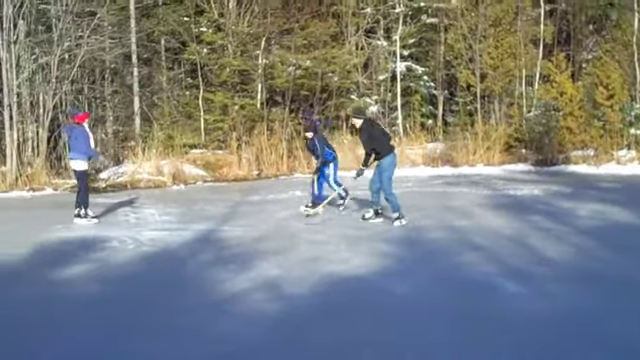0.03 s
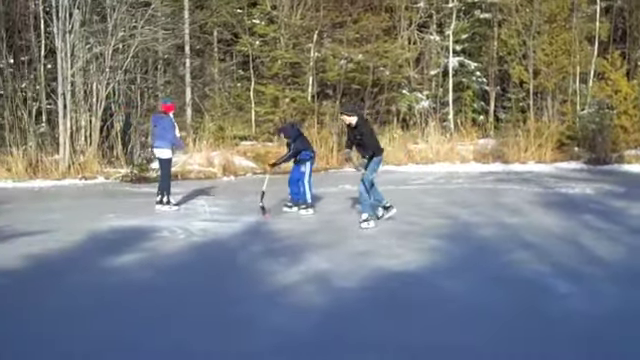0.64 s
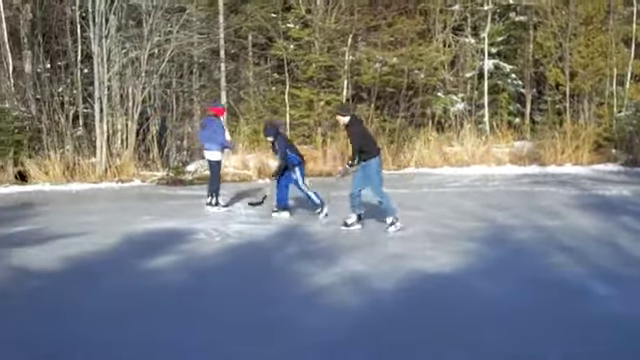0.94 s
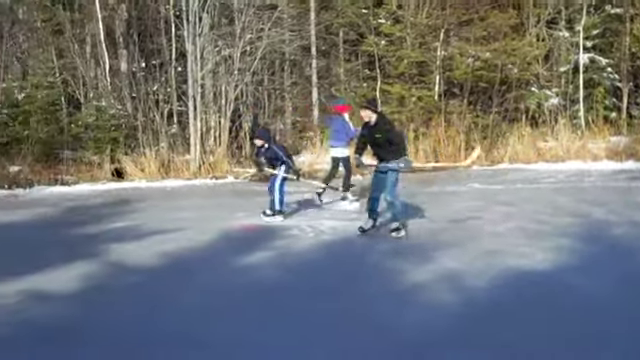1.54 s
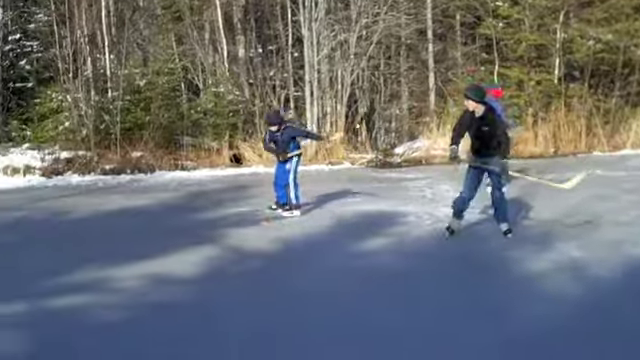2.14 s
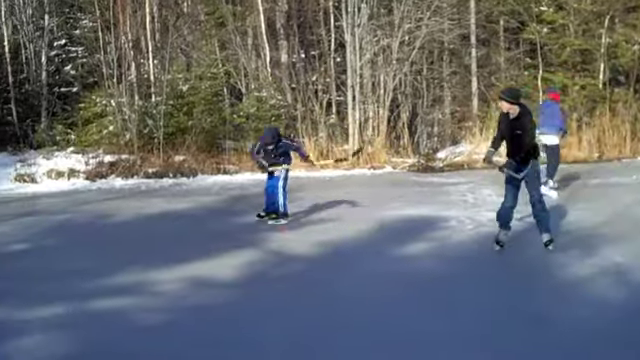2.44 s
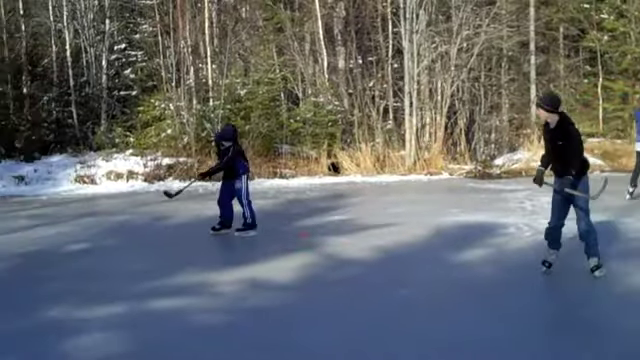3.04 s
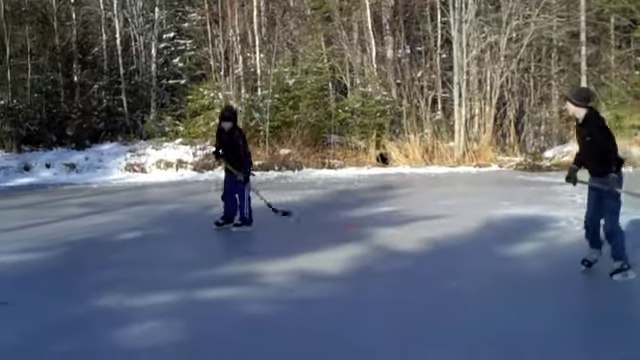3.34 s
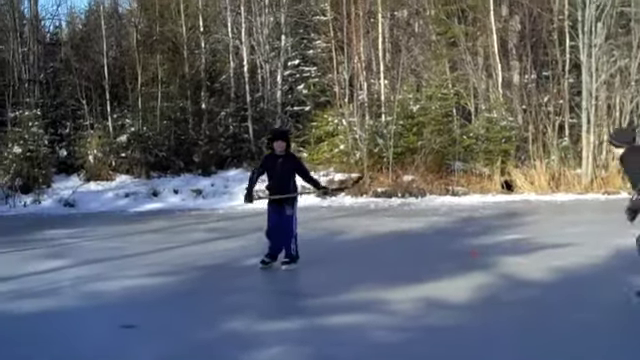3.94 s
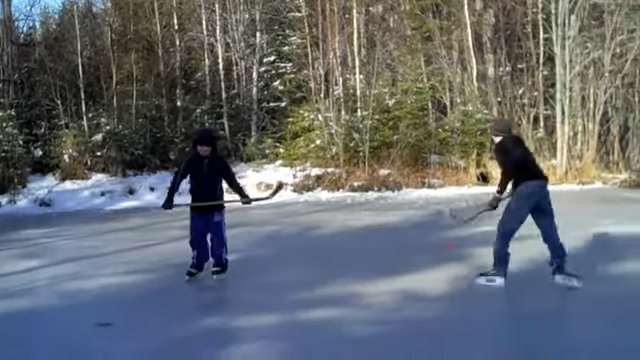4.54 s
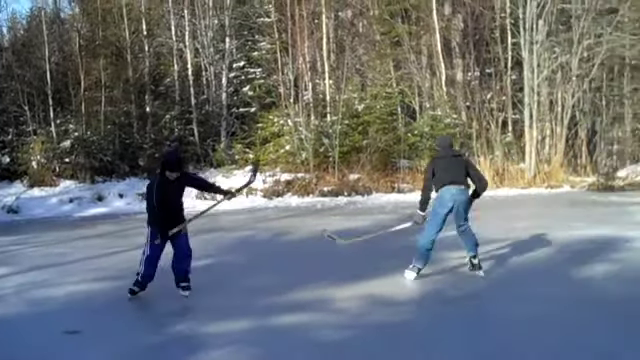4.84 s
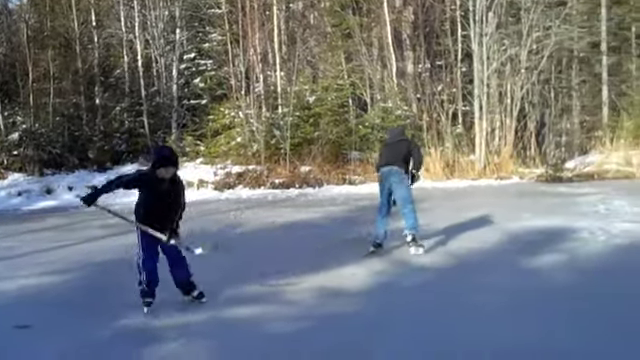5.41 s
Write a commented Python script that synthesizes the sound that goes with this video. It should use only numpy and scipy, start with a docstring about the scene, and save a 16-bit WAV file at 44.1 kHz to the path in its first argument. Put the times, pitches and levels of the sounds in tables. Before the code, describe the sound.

Hissing, gritty skate strokes on a frozen pond, with hollow wooden stick taps and a single bright crack of stick on puck.

```python
"""Hockey on a frozen pond. From the start, blades shave the ice by stick-slip friction and the
sheet hums and thuds under the skaters' weight; chips fracture off in a flurry from 0.6 s.
At 2.3 s a stick first taps, and at 2.6 s a slap shot cracks, coloured by bright narrow peaks.
More taps and strokes follow, with a second flurry of chips at 4.6 s. Throughout, the forest
along the shore scatters the sound back, over a faint breeze."""
import sys
import numpy as np
from scipy import signal
from scipy.fft import rfft, irfft, next_fast_len
from scipy.io import wavfile
from scipy.ndimage import uniform_filter1d, map_coordinates

SR = 44100
rng = np.random.default_rng(int(sys.argv[2]) if len(sys.argv) > 2 else 0)


def waveform_to_disk(signal):
    """Save audio, clipped to [-1, 1], as 16-bit WAV at the path in sys.argv[1]."""
    frames = np.transpose(np.atleast_2d(signal))
    scaled = np.clip(frames, -1, 1) * 32767
    samples = np.round(scaled).astype(np.int16)
    wavfile.write(sys.argv[1], SR, samples)


N = 245637

# hiss spectrum of the steel edge: f/Hz, level/dB
EDGE_SPECTRUM = [(2500, -38), (3500, -4.5), (4150, 2), (4700, -1), (5900, 2.5), (6700, -2), (7400, 1),
                 (8300, -9), (9000, -12.5), (9800, -20.5), (13500, -32), (15000, -54)]
# grinding spectrum of boot and blade holder: f/Hz, level/dB
GRIND_SPECTRUM = [(120, -29), (400, -10), (800, -8.5), (1100, -4.5), (1700, -3), (2000, -4), (2350, -1.5),
                  (2800, -5), (3300, -3.5), (4500, -31.5), (8000, -42)]


def amp(db):
    """Amplitude ratio of a level in decibels."""
    return 10 ** (np.asarray(db) / 20)


def unit(x):
    """Normalisation to rms 1."""
    return x / np.sqrt(np.mean(x ** 2) + 1e-20)


def along(points, hz):
    """Interpolation of (f/Hz, value) points on a logarithmic frequency axis."""
    f, values = np.transpose(points)
    return np.interp(np.log(hz + 1), np.log(np.sort(f)), values)


def wobble(rate):
    """Smooth random modulation: a spline through `rate` knots a second."""
    knots = rng.standard_normal(int(N * rate / SR) + 4)
    return map_coordinates(knots, [np.arange(N) * rate / SR])


def add(track, start_s, sound):
    """Superposition of a sound on a track."""
    start = max(round(start_s * SR), 0)
    track[start:start + len(sound)] += sound[:N - start]


def filtered(x, response):
    """Linear filtering: the spectrum of x times a complex frequency response."""
    size = next_fast_len(x.shape[-1] + 4096, True)
    hz = np.fft.rfftfreq(size, 1 / SR)
    return irfft(rfft(x, size) * response(hz), size)[..., :x.shape[-1]]


def coloured(x, spectrum):
    """Minimum-phase filtering with unit energy: the spectrum sets shape, not level."""
    size = 2048
    cepstrum = irfft(np.log(amp(along(spectrum, np.fft.rfftfreq(size, 1 / SR)))))
    cepstrum[1:size // 2] *= 2  # folding the cepstrum makes the filter causal
    cepstrum[size // 2 + 1:] = 0
    kernel = irfft(np.exp(rfft(cepstrum)))
    return signal.fftconvolve(x, kernel / np.linalg.norm(kernel))[:len(x)]


def band_pass(f, centre, width):
    """Second-order band-pass response, 1 at its centre; all arguments in Hz."""
    return 1j * f * width / (centre ** 2 - f ** 2 + 1j * f * width)


def burst(hold, t60, attack):
    """Noise of a crushing contact: rise, hold and exponential decay, times in s."""
    t = np.arange(SR // 4) / SR
    decay = amp(-60 * np.maximum(t - hold, 0) / t60)
    return rng.standard_normal(len(t)) * (1 - np.exp(-t / attack)) * decay


def ports(x, diffuse_db):
    """Diffraction: two close microphone ports share the bass; their housing scatters and shades treble."""
    # scattered sound against direct: f/Hz, level/dB
    diffuse_share = [(250, -30), (1000, -20), (2500, -13), (6000, -10), (8500, -5), (10000, -2)]
    # shadowing, left minus right: f/Hz, level/dB
    balance = [(2300, 0), (4600, -0.5), (5900, -7), (7400, 14.5), (10000, 7.5), (14000, 12)]
    # lead of the left port: f/Hz, phase/rad
    lead = [(2500, -0.08), (5300, -0.32), (6700, 0.63), (8200, -0.68), (10500, -0.45)]
    t = np.arange(SR // 100) / SR
    sprays = rng.standard_normal((3, len(t))) * np.exp(-t / .002)  # short reflections in a drifting mix
    scattered = sum(wobble(20) * signal.oaconvolve(x, h / np.linalg.norm(h))[:N] for h in sprays)
    side = filtered(scattered / np.sqrt(len(sprays)), lambda hz: amp(diffuse_db + along(diffuse_share, hz)))

    def shade(hz):
        halves = [[.5], [-.5]]
        pair = amp(along(balance, hz) * halves) * np.exp(1j * along(lead, hz) * halves)
        return pair / np.abs(pair.mean(axis=0))
    return filtered(np.array([x + side, x - side]), shade)


def placed(pair):
    """Time of arrival: sound from the right reaches the left port later."""
    # bearing of the busiest skater: t/s, angle to the right/deg
    path = [(0, 5), (2.6, 20), (3.5, 27), (4.7, 20), (5.5, -26)]
    n = np.arange(N)
    bearing = np.radians(np.interp(n / SR, *np.transpose(path)))
    lag = SR * .02 * np.sin(bearing) / 343  # samples, for ports 0.02 m apart
    return np.array([map_coordinates(pair[0], [n - lag / 2]), map_coordinates(pair[1], [n + lag / 2])])


def winter_air():
    """Ambient noise: a faint, stationary broadband floor."""
    # still air: f/Hz, level/dB
    air_spectrum = [(15, -68), (25, -11), (243, 3.5), (318, 10), (769, -2), (1390, -16), (7280, 4.5),
                    (13800, -25.5), (15000, -53)]
    return amp(-58.5) * unit(coloured(rng.standard_normal(N), air_spectrum))


def breeze():
    """Flow noise: moving air rumbles below about 80 Hz, uncorrelated between the ports."""
    return amp(-66.5) * unit(filtered(rng.standard_normal((2, N)), lambda hz: 1 / (1 + (hz / 80) ** 2)))


def forest(x, delay, t60, rise):
    """Scattering: trunks along the shore return a dense echo that swells and decays; times in s."""
    # colour of the echo: f/Hz, gain/dB
    echo_spectrum = [(150, -2), (1500, 2), (3000, -2.5), (7000, -7.5), (12000, -1)]
    late = np.maximum(np.arange(SR) / SR - delay, 0)
    tail = rng.standard_normal(SR) * (1 - np.exp(-late / rise)) * amp(-60 * late / t60)
    tail = filtered(tail / np.linalg.norm(tail), lambda hz: amp(along(echo_spectrum, hz)))
    return signal.fftconvolve(x, tail)[:N]


def steps():
    """Impact on a plate: a skater's weight lands and the ice sheet thuds."""
    # landings: t/s, relative level/dB
    landings = [(0.203, -33), (0.224, -30), (0.559, -32.5), (0.803, -36), (0.967, -45), (1.247, -32),
                (2.175, -33.5), (2.218, -34.5), (2.575, -35), (3.963, -36), (4.012, -34.5), (4.329, -43),
                (4.425, -36.5), (4.719, -33)]
    # the sheet's response to a landing: f/Hz, level/dB
    thud_spectrum = [(25, -30), (60, -32), (100, -26), (160, -1.5), (240, -0.5), (340, 7), (560, 1),
                     (900, -13), (1800, -40)]
    force = np.zeros(N)
    for start, db in landings:
        add(force, start, amp(db - 6) * burst(hold=0.0037, t60=0.094, attack=0.0015))
    return coloured(force, thud_spectrum)


def taps():
    """Free vibration: a short contact leaves one damped, hollow mode of the stick sounding."""
    # a stick meets puck or ice: t/s, relative level/dB, mode f/Hz
    knocks = [(2.2562, -31.5, 1370), (2.9827, -30.5, 1375), (3.3718, -31, 1540), (3.387, -32.5, 1360),
              (3.499, -37.5, 1370), (3.568, -39.5, 1320), (3.966, -36.5, 1420), (5.2627, -30.5, 1320),
              (5.503, -23, 1390)]
    # wooden contact: f/Hz, level/dB
    wood_spectrum = [(150, -31), (500, -22), (900, 9), (1450, -18), (1900, 11.5), (2300, 9), (4500, 3.5),
                     (7000, 3.5), (12000, -41)]
    contact, hollow = np.zeros((2, N))
    t = np.arange(SR // 10) / SR
    envelope = amp(-60 * t / 0.03) * (1 - np.exp(-t / 0.0016))
    for start, db, hz in knocks:
        add(contact, start, amp(db) * burst(hold=0.0014, t60=0.026, attack=0.00039))
        add(hollow, start, amp(db + 2) * envelope * np.sin(2 * np.pi * hz * t))
    return coloured(contact, wood_spectrum) + hollow


def effort():
    """Incoherent addition: stroke and glide powers sum to the gains of hiss, grinding and ice sheet."""
    # pushes of a blade: t/s, duration/s, hiss level/dB, grinding re hiss/dB, load on the sheet/dB
    strokes = [(-0.02, 0.3, -35, -5.5, -12), (0.516, 0.043, -38, -4.5, -4), (0.625, 0.018, -33.5, -9, -3),
               (0.685, 0.058, -37, -5, 4.5), (0.76, 0.12, -39.5, -6, 1), (0.894, 0.12, -49, 1.5, -7),
               (1.228, 0.068, -36.5, -3, -2), (1.322, 0.035, -36.5, -4, -3), (1.372, 0.039, -31, -5.5, -6),
               (1.479, 0.049, -44.5, 1.5, -1.5), (1.557, 0.046, -41.5, -2, -2),
               (1.623, .12, -38, -0.5, -1.5), (1.788, 0.061, -45.5, 3, -3.5), (1.883, 0.14, -66, 4, 4),
               (2.067, 0.017, -46.5, 5.5, 3), (2.144, 0.1, -48.5, -4, -1.5), (2.44, 0.19, -53.5, 1.5, 1),
               (2.886, 0.076, -43.5, 0.5, -3), (3.25, 0.017, -46, -0.5, 4), (3.313, 0.037, -51, -1, 0),
               (3.405, 0.081, -47, -1.5, 2), (3.549, 0.027, -50, 4, 4.5), (3.688, 0.16, -50, 0.5, 1),
               (3.928, 0.13, -45.5, -1, -0.5), (4.033, 0.048, -39, -6, -15), (4.178, 0.031, -46.5, 0, -2.5),
               (4.413, 0.15, -45, -1.5, -0.5), (4.586, 0.085, -35.5, -9, 7), (4.682, 0.13, -33.5, -7, 4),
               (4.871, 0.054, -43.5, 4.5, 5.5), (4.892, 0.13, -45, 0.5, 7.5), (5.103, 0.21, -42, -5, -2.5),
               (5.311, 0.23, -39.5, -2, 3)]
    attack_s, release_db_per_s = 0.0092, 212  # the edge digs in, then lifts away
    glide_db = [[-52.5], [-53], [-56.5]]  # coasting: hiss, grinding, sheet
    t = np.arange(N) / SR
    power = amp(glide_db) ** 2 * np.ones(N)
    for start, length, hiss_db, grind_db, weight_db in strokes:
        rise = np.clip((t - start) / attack_s, 0, 1)
        release = amp(-release_db_per_s * np.maximum(t - start - length, 0))
        sheet_db = -50 + 0.34 * (hiss_db + 38.5) + weight_db  # grows 0.34 dB per dB of hiss
        power += (amp([[hiss_db], [hiss_db + grind_db], [sheet_db]]) * rise * release) ** 2
    return np.sqrt(power)


def fractures(rate, spread_db, life, smooth):
    """Stick-slip envelope: `rate` slips a second, time constant `life`/s, over a `smooth` power share."""
    gaps, strengths = rng.random((4000, 2)).T
    onsets = (np.cumsum(.2 + 1.6 * gaps) * SR / rate).astype(int)
    energy = np.bincount(onsets[onsets < N], amp(spread_db * strengths[onsets < N]) ** 2, N)
    age = np.arange(SR // 20) / SR / life
    power = np.abs(signal.fftconvolve(energy, age * np.exp(-age))[:N])
    return np.sqrt(smooth + (1 - smooth) * power / power.mean())


def patchy(x, depth_db):
    """Random spectral modulation: resonances come and go as blade angle and contact point change."""
    spectra = signal.stft(x, nperseg=512)[2]
    field = uniform_filter1d(rng.standard_normal(spectra.shape), size=4, axis=0)  # smooth in frequency
    field = uniform_filter1d(field, size=6, axis=1)  # and in time
    return unit(signal.istft(spectra * amp(depth_db * unit(field)), nperseg=512)[1][:N])


def blades():
    """Friction excitation: each slip drives the steel edge, boot and holder, and the floating ice."""
    # hum of the ice sheet: f/Hz, level/dB
    sheet_spectrum = [(25, -48), (140, -1), (250, -3), (320, 6), (600, 2.5), (850, -8.5), (1600, -28.5)]
    edge_gain, grind_gain, sheet_gain = effort()
    bumps = amp(1.4 * wobble(70))  # uneven ice makes the pressure on the edge flutter
    slips = bumps * fractures(rate=280, spread_db=19, life=0.00081, smooth=0.35)

    def scrape(spectrum, depth_db):
        friction = slips * patchy(rng.standard_normal(N), depth_db)
        return unit(coloured(friction, spectrum))
    edge = edge_gain * scrape(EDGE_SPECTRUM, depth_db=2)
    grind = grind_gain * scrape(GRIND_SPECTRUM, depth_db=2)
    sheet = sheet_gain * scrape(sheet_spectrum, depth_db=1.5)
    return edge + grind + sheet


def chips():
    """Brittle fracture: a bright snap inside a few milliseconds of crushing that shakes edge and boot."""
    # a blade bites off ice: t/s, relative level/dB, boot's offset/dB
    bites = [(0.109, -26, -1), (0.23, -10, -21), (0.466, -19.5, -5.5), (0.596, -8, -5), (0.616, -11.5, -9),
             (0.622, -6.5, -7.5), (0.649, -19, -1), (0.674, -10, -5.5), (0.689, -12.5, -11),
             (0.707, -15, -5), (0.7228, -12, -9), (0.733, -14.5, -2), (0.742, -13, -6.5), (0.75, -15, -6),
             (0.782, -14, -4.5), (0.803, -16, -9), (0.838, -11.5, -7), (0.847, -19, -10), (1.1536, -13, -8),
             (1.189, -15, -6.5), (1.217, -18, -6), (1.402, -20, -7), (1.413, -14.5, -19),
             (1.5631, -12.5, -11), (1.71, -14.5, -5), (2.3, -26.5, 2), (3.135, -28, -7), (3.351, -30, -8),
             (3.849, -20.5, -2.5), (3.924, -24, -3.5), (4.369, -27, -8), (4.423, -18.5, -6),
             (4.589, -11, -5), (4.593, -6.5, -12), (4.607, -11.5, -2.5), (4.616, -9, -11),
             (4.6217, -11, -9), (4.6303, -11, -3.5), (4.641, -9, -8), (4.653, -9, -8), (4.659, -7.5, -6),
             (4.6685, -6.5, -10), (4.6712, -18, -8), (4.685, -6, -9), (4.715, -18, -6), (4.735, -20, -6),
             (4.774, -18, -11), (5.117, -13.5, -6.5), (5.125, -15, -7), (5.2, -15.5, -8), (5.405, -23, -1),
             (5.427, -13.5, -3.5), (5.503, -9, -10)]
    # breaking ice: f/Hz, level/dB
    snap_spectrum = [(300, -22), (2000, -4), (7000, 3), (10000, -28)]
    snap, edge, boot = np.zeros((3, N))
    for start, db, boot_db in bites:
        add(snap, start + .001, amp(db - 12) * burst(hold=.0005, t60=.004, attack=.0001))
        add(edge, start, amp(db - 15.5) * burst(hold=0.0025, t60=0.023, attack=0.001))
        add(boot, start, amp(db + boot_db - 9.5) * burst(hold=0.00084, t60=0.024, attack=0.00098))
    return coloured(snap, snap_spectrum) + coloured(edge, EDGE_SPECTRUM) + coloured(boot, GRIND_SPECTRUM)


def swelling(x):
    """Band emphasis: bands of the scrape swell during a stroke, some ringing, some broad."""
    # swelling bands: start t/s, end t/s, f/Hz, bandwidth/Hz, boost/dB
    bands = [(0, 0.21, 5100, 300, 7.5), (0.042, 0.243, 2090, 880, 5.5), (0.566, 0.79, 2300, 450, 9),
             (0.576, 0.76, 5900, 300, 4), (1.183, 1.223, 4160, 120, 14), (3.475, 3.597, 2500, 450, 7.5),
             (1.584, 1.732, 5600, 1200, 9), (1.718, 1.768, 4270, 704, 9.5), (1.857, 2.094, 318, 40, 10.5),
             (4.615, 4.68, 6200, 500, 7), (4.545, 4.783, 850, 696, 5), (4.87, 5.02, 375, 49.7, 9.5)]
    out = x.copy()
    for start, end, hz, width, db in bands:
        stroke = x[max(round(start * SR), 0):round(end * SR)]
        band = filtered(stroke, lambda f: band_pass(f, hz, width))
        fade = signal.get_window(("tukey", .5), len(band))
        add(out, start, (amp(db) - 1) * fade * band)
    return out


def slap_shot():
    """Impact and friction: the stick slams onto ice and puck with a bright crack, then drags on the ice."""
    # blows on ice and puck: t/s, relative level/dB, contact/s, 60 dB decay/s
    blows = [(2.5897, -9.5, 0.0031, 0.01), (2.592, -5, 0.0019, 0.0099), (2.5949, -6.5, 0.0013, 0.025)]
    # scuffs of the follow-through: t/s, relative level/dB, contact/s, 60 dB decay/s
    scuffs = [(2.602, -23.5, 0.012, 0.034), (2.612, -20, 0.005, 0.1), (2.627, -24.5, 0.0047, 0.043)]
    # bright narrow peaks that colour the crack: f/Hz, bandwidth/Hz, relative level/dB
    peaks = [(2230, 90, 1), (4030, 250, 3), (5740, 98, -6), (6700, 70, 4), (6900, 150, 9)]
    # crack of the impact: f/Hz, level/dB
    crack_spectrum = [(59, -41), (100, -31), (425, -17), (867, -35), (1460, -6), (2230, -8), (2990, -5.5),
                      (3920, -5.5), (4730, -5), (6090, 9.5), (9260, -13), (10300, -21), (15000, -44)]
    # stick sliding on ice: f/Hz, level/dB
    drag_spectrum = [(180, -40), (300, -26), (1010, -8.5), (1210, -11.5), (2360, -4), (4700, -5),
                     (6200, -0.5), (8500, -11.5), (10000, -25), (13600, -34), (15000, -62)]
    blow, drag = np.zeros((2, N))
    for start, db, hold, t60 in blows:
        add(blow, start, amp(db) * burst(hold, t60, attack=0.00027))
    for start, db, hold, t60 in scuffs:
        add(drag, start, amp(db) * burst(hold, t60, attack=0.00058))
    crack = amp(-2.5) * coloured(blow, crack_spectrum)
    bright = filtered(blow, lambda f: sum(amp(db) * band_pass(f, hz, width) for hz, width, db in peaks))
    grit = fractures(rate=650, spread_db=15, life=0.0003, smooth=0.6)
    return crack + amp(-14) * np.std(blow) * unit(bright) + coloured(drag * grit, drag_spectrum)


def scene():
    """Superposition of the players, the shot from straight ahead, their echo and the air."""
    play = swelling(blades() + chips()) + taps() + steps()
    shot = slap_shot()
    echo = amp(-11.5) * forest(play + shot, delay=0.017, t60=0.44, rise=0.078)
    pond = ports(play + echo + winter_air(), diffuse_db=1.5)
    return placed(pond) + ports(shot, diffuse_db=-22) + breeze()


def record(dry):
    """Saturation and band limiting: peaks are rounded, deep bass is thinned, the top treble is cut."""
    low_cut_hz, top_hz = 92, 14500
    rounded = dry / (1 + np.abs(dry) ** 6) ** (1 / 6)
    return filtered(rounded, lambda hz: (hz < top_hz) * hz / np.hypot(hz, low_cut_hz))


dry = scene()
out = record(dry)
waveform_to_disk(out)
```